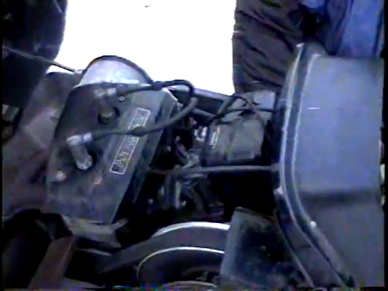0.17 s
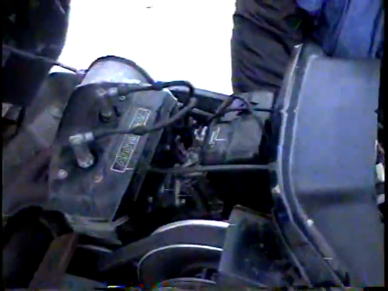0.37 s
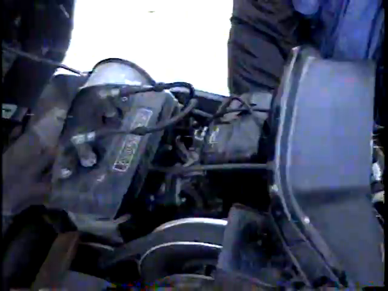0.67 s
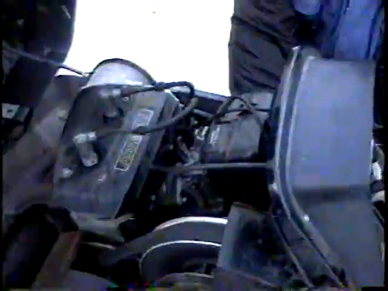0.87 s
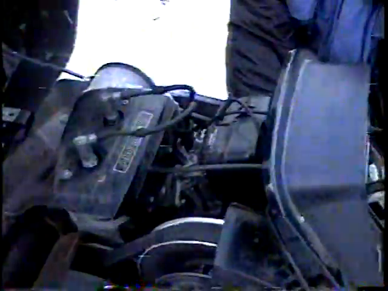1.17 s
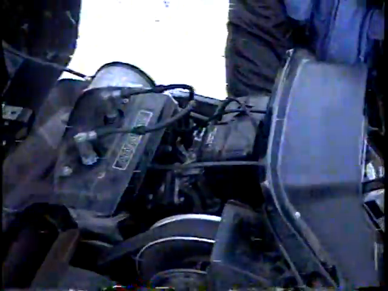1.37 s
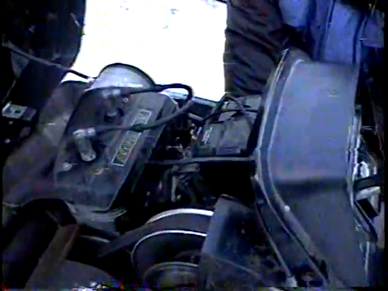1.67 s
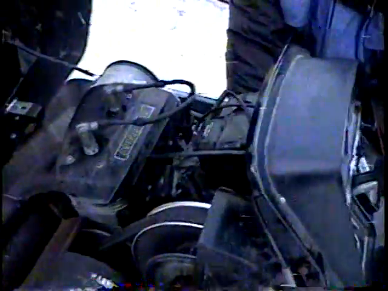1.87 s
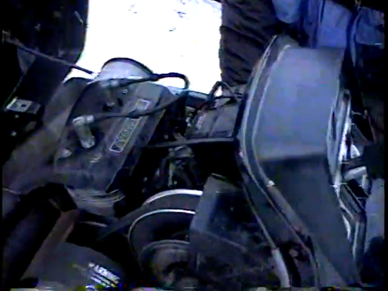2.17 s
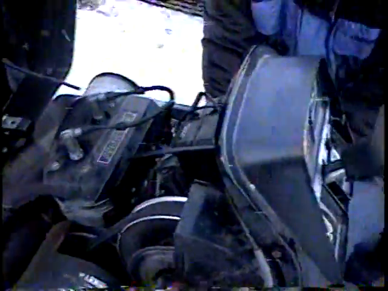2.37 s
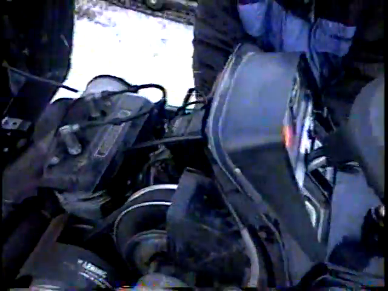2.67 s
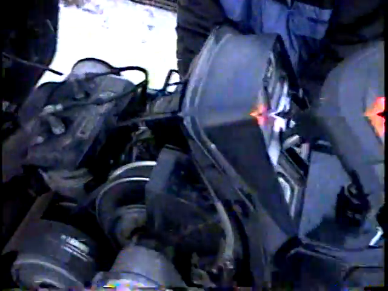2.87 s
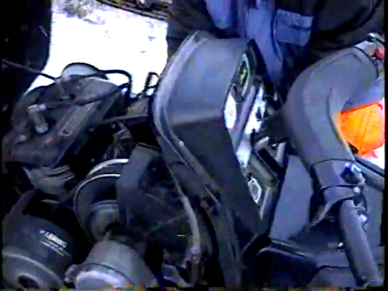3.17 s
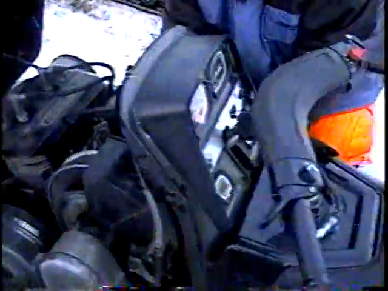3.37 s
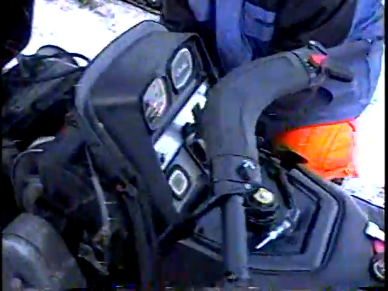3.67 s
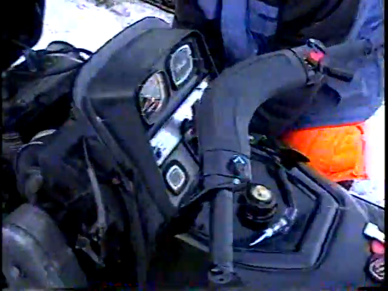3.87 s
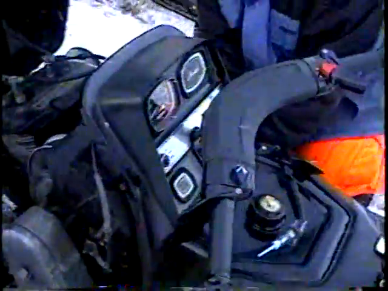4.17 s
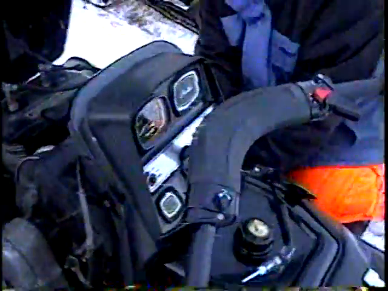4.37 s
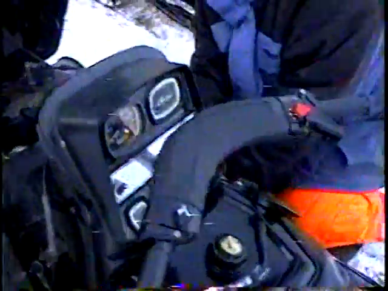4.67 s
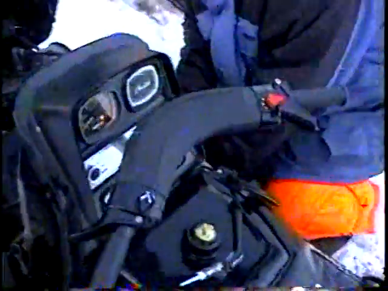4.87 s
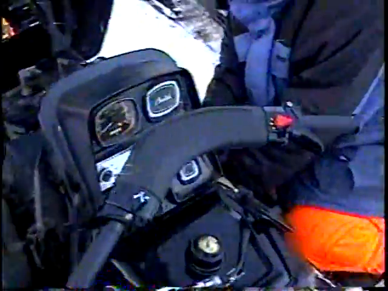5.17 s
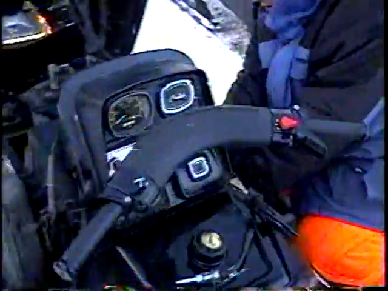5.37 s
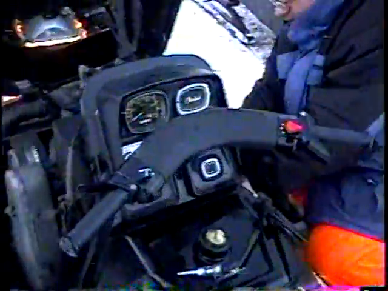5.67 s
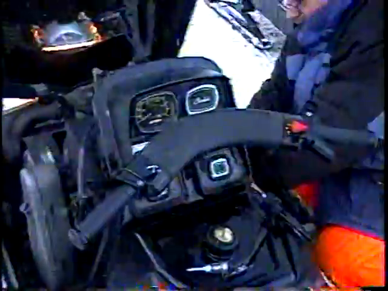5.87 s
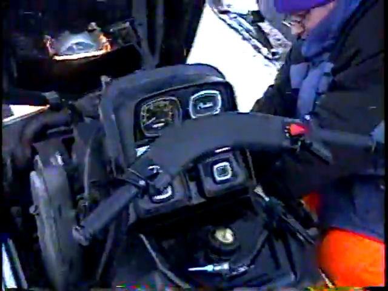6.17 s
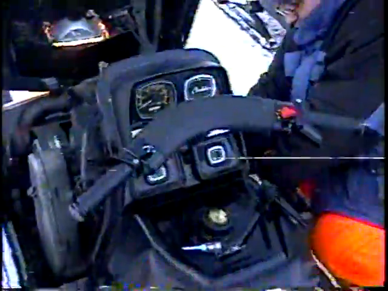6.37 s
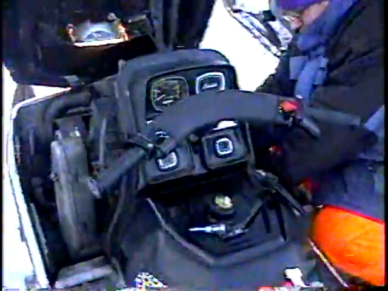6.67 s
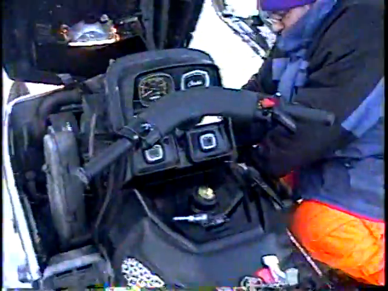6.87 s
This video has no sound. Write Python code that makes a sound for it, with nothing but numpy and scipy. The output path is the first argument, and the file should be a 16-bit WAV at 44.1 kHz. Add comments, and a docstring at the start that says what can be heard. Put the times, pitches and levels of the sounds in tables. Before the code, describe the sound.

Outdoors, a microphone close to an open snowmobile hood picks up a rough, sputtering two-stroke idle, nearly all in the right channel. Irregular low thumps, metallic cracks and small hissing puffs run throughout, along with fan noise and a throbbing whine. Early bursts of tinny rattling give way to a slightly duller, boomier sound as the microphone drifts behind the dashboard. Very faint hiss, hum and a thin high whistle lie underneath.

```python
"""At an open hood, a two-cylinder two-stroke engine idles as the listener drifts to the handlebar.
Most strokes misfire and only pump gas; those that fire crack in the cylinder and thump in the pipe.
The magneto (the spark generator) whines with the crankshaft, the air box gulps, the fan rushes and
loose metal buzzes. The engine is almost wholly on the right; on the left are faint hiss, mains hum
and a thin, high whistle."""
import sys
import numpy as np
from scipy import signal
from scipy.io import wavfile
from scipy.ndimage import uniform_filter1d

SR = 44100
rng = np.random.default_rng(int(sys.argv[2]) if len(sys.argv) > 2 else 0)


def materialize(psi):
    """Save the field psi as 16-bit PCM at rate SR to the path in sys.argv[1].

    A 1-D psi becomes a single channel; in a 2-D psi each row is a channel.
    """
    bounded = np.clip(np.atleast_2d(psi).T, -1, 1)
    quanta = np.round(bounded * 32767).astype(np.int16)
    wavfile.write(sys.argv[1], SR, quanta)


N = 310023
T = np.arange(N) / SR

# strokes that fire: t/s, thump level/dB, crack level/dB, size of the kick to the pole rate/Hz
FIRINGS = [(0.068, -18.5, -52, 2), (.16, -11.5, -27, 0), (0.252, -10.5, -21, 5), (.341, -18, -46, 2),
           (0.433, -11.5, -28, 5), (.452, -12.5, -31, -0.5), (0.581, -11.5, -27.5, 4),
           (.634, -15.5, -42, 0), (0.724, -10, -35, 2), (.874, -18, -42.5, 0), (.911, -14, -59, 0),
           (.931, -15.5, -42.5, 0), (1.025, -12.5, -38.5, 0.5), (1.214, -13, -25, 8), (1.234, -16, -54, 0),
           (1.363, -16.5, -33, 0), (1.382, -8.5, -26, 4), (1.48, -12.5, -37, 1), (1.538, -13.5, -38, 3),
           (1.633, -15.5, -24.5, 7), (1.725, -14, -25.5, 5), (1.817, -12.5, -21, 9.5),
           (1.906, -9, -23.5, 4.5), (1.996, -10, -31, 10), (2.085, -12.5, -26, 2.5),
           (2.176, -13.5, -28, 11), (2.337, -12, -32, 5), (2.354, -14.5, -28, 5), (2.421, -22, -27.5, 0),
           (2.462, -16, -28, 8), (2.552, -16.5, -24.5, 7), (2.645, -24, -33.5, 5), (2.718, -26.5, -31.5, 4),
           (2.773, -18.5, -52, 5), (2.92, -14, -27.5, 9), (2.937, -13, -29, 0), (3.088, -11.5, -29, 10),
           (3.239, -9.5, -37.5, 4), (3.334, -13.5, -46, 9), (3.353, -13, -35, 0), (3.39, -12, -65, 0.5),
           (3.485, -9, -26, 11), (3.581, -14, -43, 5.5), (3.729, -10, -22, 14), (3.749, -12, -40, 0),
           (3.861, -12.5, -28.5, 9), (3.878, -13, -34, 0), (3.951, -16.5, -33, 2),
           (4.013, -17.5, -46.5, 2.5), (4.106, -14, -29, 10), (4.125, -14.5, -29, 0.5),
           (4.24, -13.5, -29, 5), (4.338, -8.5, -27, 7), (4.358, -8.5, -25, 5), (4.513, -13, -49, 6),
           (4.609, -12, -34, 9.5), (4.628, -9.5, -29.5, 0.5), (4.782, -10.5, -30, 16),
           (4.799, -14, -32, 0.5), (4.934, -11.5, -33, 3), (4.952, -8, -25, 11.5), (5.102, -10.5, -28, 11),
           (5.195, -13, -30, 9.5), (5.286, -13.5, -68, 6.5), (5.38, -9.5, -28, 11), (5.473, -13.5, -28, 13),
           (5.562, -11, -31, 9.5), (5.652, -13.5, -43, 6), (5.744, -10.5, -31, 11.5),
           (5.764, -11, -33, -0.5), (5.874, -12, -33.5, 8), (5.929, -10, -39, 5), (6.023, -9.5, -30.5, 8.5),
           (6.115, -10, -30, 7), (6.212, -10.5, -30, 9), (6.267, -12.5, -34, 3), (6.361, -8.5, -26.5, 14),
           (6.382, -7.5, -40, 0.5), (6.512, -10, -32, 8), (6.53, -7, -27.5, 12), (6.661, -7.5, -33, 7.5),
           (6.717, -12.5, -50, 3.5), (6.811, -8, -30.5, 12.5), (6.83, -8.5, -34, -1),
           (6.962, -9, -32, 13.5)]
# how often the magneto's poles pass (six a turn) without those kicks: t/s, f/Hz
BASE_POLE_RATE = [(0.0, 161.5), (2.34, 147.5), (4.69, 139.3), (7.03, 135.8)]
# where the listener lingers, from cylinders to handlebar: from t/s, to t/s, levels/dB of magneto
# multiples 2, 3 and 7, pumping level/dB, clatter level/dB, way behind the dash/0-1, rattle level/dB
STOPS = [(0, 2.1, -42, -37, -48, -21, -35, 0, -44.5), (2.501, 2.97, -46.5, -69, -51, -23, -38.5, 0, -41.5),
         (3.07, 3.5, -30.5, -47, -47, -19.5, -33, 0.34, -44.5),
         (4.4, 4.4, -29.5, -58, -57, -19.5, -32, 0.73, -41), (5.8, 9.3, -32, -39, -46, -18.5, -32, 1, -67)]
# the same as a path: t/s, then the seven values of a stop
PATH = [(s, *heard) for start, end, *heard in STOPS for s in (start, end)]
# the magneto's tones, as multiples of the pole rate
MULTIPLES = np.array([2, 3, 7, 5])
# the whine at five times the pole rate, before the case muffles it: t/s, level/dB
WHINE_LEVEL = [(0, -28.5), (.7, -29), (1.1, -27), (1.75, -26), (2.2, -30.5), (2.7, -32), (3.05, -26),
               (4.7, -30), (5.2, -34), (5.9, -45.5), (6.45, -35), (7.03, -30.5)]
# tone colour of the clatter beside the cylinders and behind the dash: f/Hz, relative level/dB
CLATTER_NEAR = [(250, 2), (408, -9), (502, -2.5), (636, -11.5), (807, -7), (916, -13.5), (1750, -16),
                (2050, -21.5), (2730, -16.5), (3700, -24), (4500, -17), (5570, -17), (6730, -21.5),
                (11000, -64.5)]
CLATTER_BEHIND = [(230, 2.5), (320, -5.5), (464, -4), (807, -14.5), (1020, -18), (1670, -17.5),
                  (1990, -27.5), (2520, -21), (3690, -30), (4800, -27), (6220, -23), (8400, -44.5),
                  (11000, -68)]
# each loose shield: its resonances (f/Hz, width/Hz, relative level/dB),
# then its bursts of buzzing (middle t/s, half length/s, rise/dB)
SHIELDS = [([(1760, 63, -5.5)], [(0.9, 0.32, 6), (2.455, 0.08, 13), (2.69, 0.09, 7)]), ([(1605, 38, -8.5)],
           [(0.5, 0.11, 13), (1.05, 0.27, 14)]), ([(5630, 240, -9), (6140, 650, -7)], [(0.92, 0.059, 13),
           (0.995, 0.027, 16.5), (1.062, 0.029, 17), (2.4, 0.046, 15.5), (2.545, 0.033, 13),
           (2.717, 0.037, 13.5), (2.86, 0.0087, 10)])]
# the singing dash panel: t/s, level/dB
PANEL_LEVEL = [(5.5, -55.5), (5.9, -42), (6.4, -62)]
# exhaust pipe resonances with cool unburnt gas and with a hot blast: f/Hz, width/Hz, relative level/dB
COLD_PIPE = [(142.7, 54, 4), (108.6, 56.3, 2), (212.2, 15, -16)]
HOT_PIPE = [(155.3, 73.3, 7), (120, 42, -6.5), (229, 104, -7)]
# cylinder and fin resonances: f/Hz, width/Hz, relative level/dB, change behind the dash/dB
FIN_RESONANCES = [(1755, 500, -1, -1), (1195, 1000, 1, 4), (2470, 580, -3.5, 3.5), (3230, 290, -6, 1),
                  (516, 170, 3, -2.5)]
# hiss bands of escaping gas: f/Hz, width/Hz
PORT_BANDS = [(5300, 2600), (6800, 980)]
# hiss on the left: f/Hz, level/dB per Hz
LEFT_HISS = [(25, -100), (4000, -115), (14300, -114), (15300, -122), (15700, -112)]
# three high whistle tones and two of mains hum: f/Hz, level/dB
WHISTLE_AND_HUM = [(15617, -83), (15676, -79), (15734, -76), (59.9, -83), (119.9, -81)]
# two faint tones on the right, about an octave below the whistle: f/Hz, level/dB
FAINT_TONES = [(7852, -74), (7882, -75)]


def amp(db):
    """Turns decibels into a gain."""
    return 10 ** (np.asarray(db) / 20)


def evened(x):
    """Scales a signal to an average power of 1."""
    return x / np.sqrt(np.mean(x ** 2) + 1e-20)


def curve(rows, column=1):
    """Joins the points of one table column with straight lines over time."""
    points = np.transpose(rows)
    return np.interp(T, points[0], points[column])


def level_at(points, hz):
    """Looks up a tone colour's level in dB at any frequency."""
    f, db = np.transpose(points)
    return np.interp(np.log(hz + 1), np.log(f + 1), db)


def keep_band(x, side, hz, order=2):
    """Keeps what lies on the "low" or "high" side of hz."""
    return signal.sosfilt(signal.butter(order, hz, side, fs=SR, output="sos"), x)


def resonate(x, hz, width):
    """A resonance at hz that swells before it dies; the narrower, the longer it rings."""
    pole = np.exp(-np.pi * width / SR) * np.exp(2j * np.pi * hz / SR)
    for _ in range(2):
        x = signal.lfilter([1 - abs(pole)], [1, -pole], x)
    return 2 * x.real


def wander(hz):
    """A random drift of typical size 1, changing about hz times a second."""
    return evened(keep_band(rng.standard_normal(N), "low", hz))


def clicks(times, size):
    """Single clicks of the given sizes, at times in seconds."""
    train = np.zeros(N)
    np.add.at(train, np.clip(np.round(times * SR).astype(int), 0, N - 1), size)
    return train


def taps(per_second):
    """Tiny knocks of random size at random moments."""
    return (rng.random(N) < per_second / SR) * rng.standard_normal(N)


def shaped(x, gain_db):
    """Colours x with gain_db(hz, t), a gain for each frequency and time."""
    hz, t, spectrum = signal.stft(x, SR, nperseg=1024)
    return signal.istft(spectrum * amp(gain_db(hz[:, None], t)), SR, nperseg=1024)[1][:N]


def pole_rate():
    """Magneto poles passing per second: firings kick the crankshaft faster, then it sags again."""
    times, _, _, kick_hz = np.transpose(FIRINGS)
    lead_s, rise_s, sag_s = .012, .005, .25  # the fuel burns before its thump leaves the pipe
    t = T[:60000]
    kick = (1 - np.exp(-t / rise_s)) * np.exp(-t / sag_s)
    return curve(BASE_POLE_RATE) + signal.oaconvolve(clicks(times - lead_s, kick_hz), kick)[:N]


def count_strokes():
    """A running count of strokes, two a turn, nudged to a whole number at each strong firing."""
    times, thump_db = np.transpose(FIRINGS)[:2]
    strokes = np.cumsum(pole_rate() / 3) / SR
    at_strong = np.interp(times[thump_db > -17.5], T, strokes)
    whole = np.cumsum(np.round(np.diff(at_strong, prepend=at_strong[0])))
    return strokes + np.interp(strokes, at_strong, whole - at_strong)


def magneto(strokes):
    """Squeezing the gas slows the crankshaft once a turn, so the magneto's whine warbles and throbs."""
    pole_hz = pole_rate()
    warbling_hz = pole_hz * (1 + 0.019 * np.sin(np.pi * strokes + 4.0) + 0.0025 * wander(41))
    phase = 2 * np.pi * np.cumsum(warbling_hz) / SR
    case_hz, case_db_per_hz = 767.6, -0.0871  # above this pitch the case lets less whine out
    case_db = case_db_per_hz * np.maximum(MULTIPLES[-1] * pole_hz - case_hz, 0)
    whine_db = curve(WHINE_LEVEL) + 1.53 * np.sin(np.pi * strokes + 5.8) + case_db
    levels_db = [curve(PATH, 1), curve(PATH, 2), curve(PATH, 3), whine_db]
    return sum(np.sqrt(2) * amp(db + 0.75 * wander(14)) * np.sin(multiple * phase)
               for db, multiple in zip(levels_db, MULTIPLES))


def clatter(behind):
    """The fan's rush and ticks of metal flutter together, and sound duller behind the dash."""
    def colour_db(hz, t):
        near_db, far_db = level_at(CLATTER_NEAR, hz), level_at(CLATTER_BEHIND, hz) - 1.5
        return near_db + np.interp(t, T, behind) * (far_db - near_db)

    ticks = amp(3.4 * np.minimum(rng.exponential(1, N), 4)) * taps(per_second=2500)
    noise = rng.standard_normal(N) + 0.4 * evened(ticks)
    noise *= amp(1.04 * wander(15))
    rush = keep_band(shaped(noise, colour_db), "high", 190, order=4)  # small parts make no bass
    treble = keep_band(rush, "high", 1000)
    return amp(curve(PATH, 5)) * rush / np.std(treble)


def intake(strokes, behind):
    """A gulp of air rings the air box once a turn, loudest halfway behind the dash."""
    gulp = np.exp(3.2 * (np.cos(np.pi * strokes + 0.9) - 1))
    air = evened(resonate(gulp * rng.standard_normal(N), hz=529, width=280))
    return amp(-50 + 44 * behind * (1 - behind)) * air


def shield_rattle(strokes):
    """Loose shields, shaken once a stroke, buzz against the engine block, each in its own bursts."""
    knocks = taps(per_second=2500)
    buzz = np.zeros(N)
    for resonances, bursts in SHIELDS:
        burst_db = sum(db * np.exp(-((T - middle) / half) ** 2) for middle, half, db in bursts)
        for hz, width, db in resonances:
            buzz += amp(db + burst_db + 2 * wander(18)) * evened(resonate(knocks, hz, width))
    return amp(curve(PATH, 7) + 2.4 * np.cos(2 * np.pi * strokes)) * buzz


def dash_panel():
    """A panel sings in one narrow band, loudest as the listener reaches the handlebar."""
    loudness = amp(curve(PANEL_LEVEL) + wander(8.4))
    return loudness * evened(resonate(rng.standard_normal(N), hz=2480, width=190))


def pipe_pulses(times, size, resonances, sign):
    """Rings the pipe with a push (sign 1) or a suck (-1); each main crest lands on its given time."""
    click = clicks(np.zeros(1), 1)
    ring = sign * sum(amp(db) * resonate(click, hz, width)[:4000] / width for hz, width, db in resonances)
    ring = keep_band(ring, "high", 75)  # the small outlet sends out little deep bass
    crest_s = np.argmax(ring[:330]) / SR
    return signal.oaconvolve(clicks(times - crest_s, size), ring / ring.max())[:N]


def misfires(strokes):
    """Strokes that do not fire pump cool gas down the pipe, most weakly just after a firing."""
    fired = np.round(np.interp(np.transpose(FIRINGS)[0], T, strokes))
    numbers = np.arange(np.ceil(strokes[0]) + 1, strokes[-1])
    chance = rng.standard_normal((len(numbers), 2))
    times = np.interp(numbers, strokes, T) - .0025 + .0004 * chance[:, 0]
    scatter_db = 1.5 * chance[:, 1] - 2.8 * np.isin(numbers - 1, fired)
    size = amp(np.interp(times, T, curve(PATH, 4)) + scatter_db)
    return pipe_pulses(times, size * ~np.isin(numbers, fired), COLD_PIPE, sign=-1)


def block_shake(strokes):
    """The engine block rocks once a stroke, making a deep hum."""
    return amp(-39.5 + 4.8 * wander(16)) * np.sin(2 * np.pi * strokes + 2.0)


def cylinder_crack(behind):
    """Each firing rattles the cooling fins just before its thump; hard ones ping the cylinder head."""
    times, _, crack_db, _ = np.transpose(FIRINGS)
    t = T[:3000]
    knock = signal.oaconvolve(clicks(times - .016, amp(crack_db)), t / .013 * np.exp(1 - t / .0099))[:N]
    fins = np.zeros(N)
    for hz, width, db, behind_db in FIN_RESONANCES:
        ring = resonate(knock * rng.standard_normal(N), hz, width) / np.sqrt(width)
        fins += amp(db + behind_db * behind) * ring
    ping_hz, ping_width_hz = 1680, 130
    blows = clicks(times - .010, amp(2 * crack_db + 11))  # 2 dB more ping for each dB of crack
    ping = SR / ping_width_hz * resonate(blows, ping_hz, ping_width_hz)
    return ping + amp(35.5) * fins


def port_hiss(behind):
    """Gas puffs out of the exhaust port at each firing, louder for strong ones, softer behind the dash."""
    times, thump_db, crack_db, _ = np.transpose(FIRINGS)
    usual_thump_db, usual_crack_db = -12, -30
    strength_db = 0.53 * (thump_db - usual_thump_db) + 0.12 * (crack_db - usual_crack_db)
    puff_db = -33.5 + strength_db - 3.5 * np.interp(times, T, behind)
    t, rise_s = T[:3000], .006
    puffs = signal.oaconvolve(clicks(times - .009, amp(puff_db)), t / rise_s * np.exp(1 - t / rise_s))
    gas = sum(resonate(rng.standard_normal(N), hz, width) for hz, width in PORT_BANDS)
    return puffs[:N] * evened(keep_band(gas, "low", 7600, order=6))  # the hood soaks up the top


def exhaust(pumping, behind):
    """Hot blasts thump in the pipe among the weaker pumping; behind the dash the seat tunnel booms too."""
    times, thump_db = np.transpose(FIRINGS)[:2]
    pipe = pipe_pulses(times, amp(thump_db), HOT_PIPE, sign=1) + pumping
    # sound from the two ends of the pipe cancels in the deep bass
    pipe = signal.sosfiltfilt(signal.butter(2, 78, "high", fs=SR, output="sos"), pipe)
    return pipe + 0.5 * behind * resonate(pipe, hz=122, width=76)


def scene():
    """The whole engine on the right, with a faint, flipped copy on the left."""
    strokes = count_strokes()
    behind = curve(PATH, 6)  # 0 beside the cylinders, 1 behind the dash
    engine = magneto(strokes) + clatter(behind) + intake(strokes, behind)
    engine += shield_rattle(strokes) + dash_panel()
    pumping = misfires(strokes)
    engine += block_shake(strokes) + cylinder_crack(behind) + port_hiss(behind) + exhaust(pumping, behind)
    return np.array([-amp(-54) * engine, engine])


def record(dry):
    """An automatic volume control dips after loud thumps; hiss, hum and whistle join; the top is cut."""
    threshold_db, recovery_db_per_s = -23.5, 60
    power_db = 10 * np.log10(abs(uniform_filter1d(dry[1] ** 2, 500)) + 1e-12)
    fall_db = T * recovery_db_per_s
    held_db = np.maximum.accumulate(power_db + fall_db) - fall_db
    excess_db = np.maximum(held_db - threshold_db, 0)
    dip_db = .4 * signal.lfilter([.002], [1, -.998], excess_db)  # smoothed over about 11 ms
    bass_cut = signal.butter(3, 40, "high", fs=SR, output="sos")
    engine = signal.sosfiltfilt(bass_cut, dry / amp(dip_db))
    left_hiss = shaped(rng.standard_normal(N), lambda hz, t: level_at(LEFT_HISS, hz) + 10 * np.log10(SR / 2))
    right_hiss = amp(-59) * signal.lfilter([1], [1, -.5], rng.standard_normal(N))
    right_hiss *= amp(1.3 * wander(60) + 0.68 * np.sin(2 * np.pi * 25 * T))
    flicker_db = 1.5 * np.sin(2 * np.pi * 29.97 * T)
    tones = sum(np.sqrt(2) * amp(db + flicker_db + 1.8 * wander(6)) * np.sin(2 * np.pi * hz * T)
                for hz, db in WHISTLE_AND_HUM)
    faint = sum(np.sqrt(2) * amp(db) * np.sin(2 * np.pi * hz * T) for hz, db in FAINT_TONES)
    mix = engine + np.array([left_hiss + tones, right_hiss + faint - amp(-14) * tones])
    top_cut = signal.firwin(1023, cutoff=15830, window=("kaiser", 9), fs=SR)
    return signal.oaconvolve(mix, top_cut[None], "same")


dry = scene()
out = record(dry)
materialize(out)
```